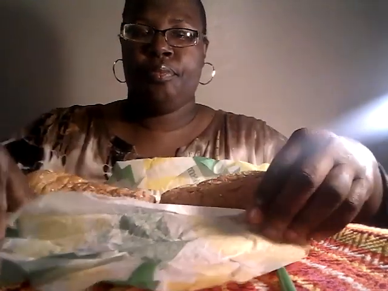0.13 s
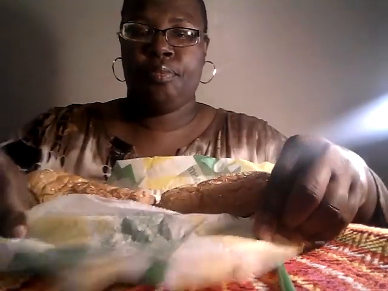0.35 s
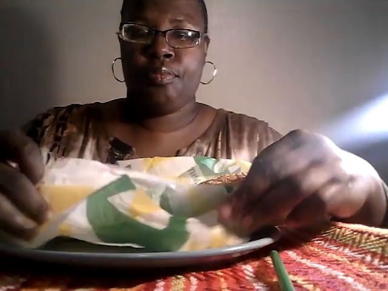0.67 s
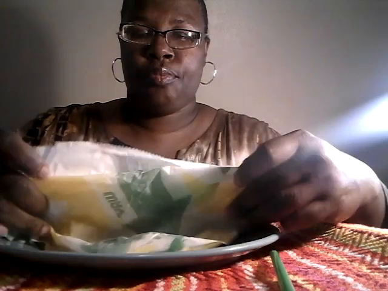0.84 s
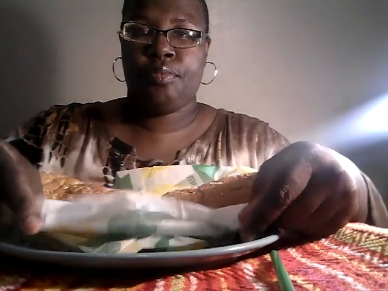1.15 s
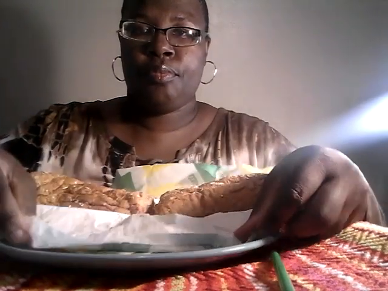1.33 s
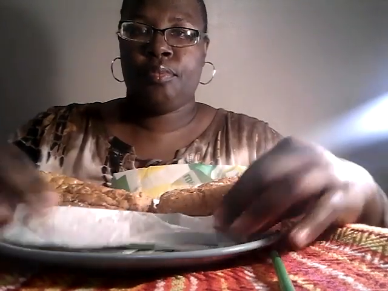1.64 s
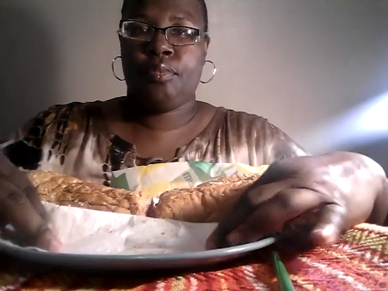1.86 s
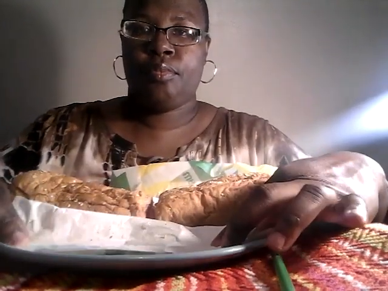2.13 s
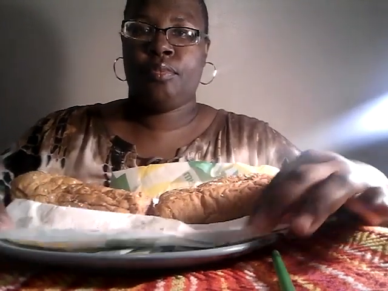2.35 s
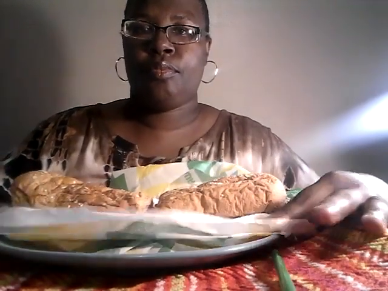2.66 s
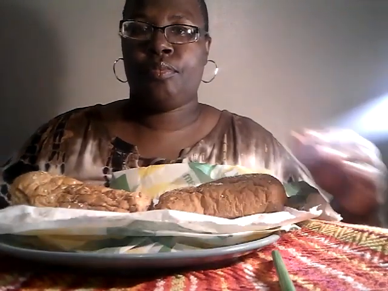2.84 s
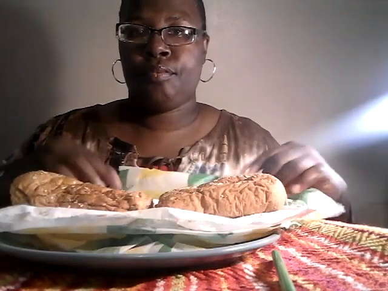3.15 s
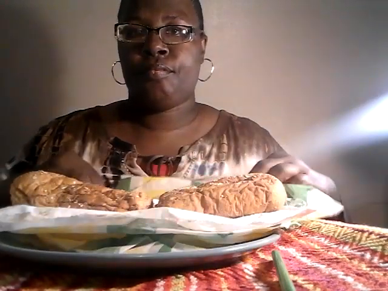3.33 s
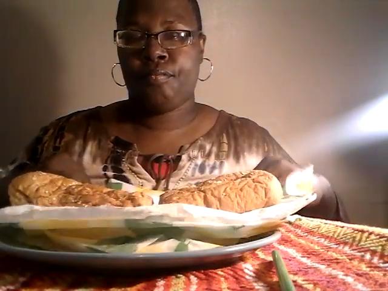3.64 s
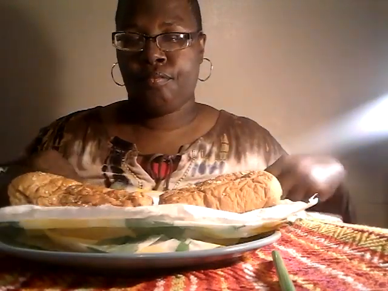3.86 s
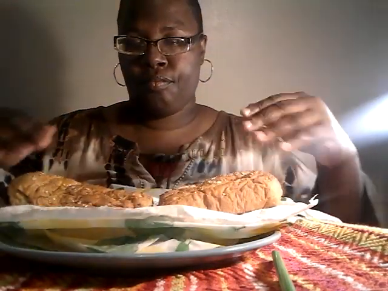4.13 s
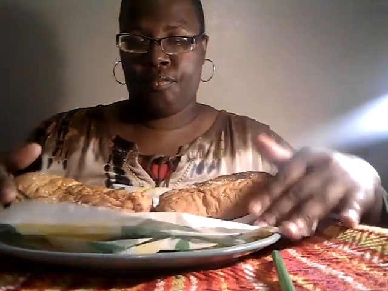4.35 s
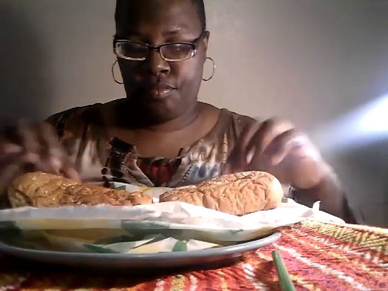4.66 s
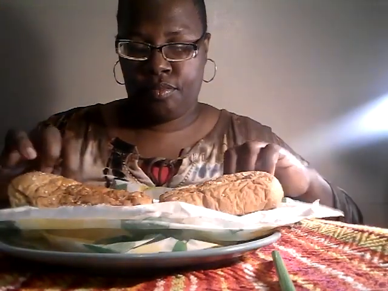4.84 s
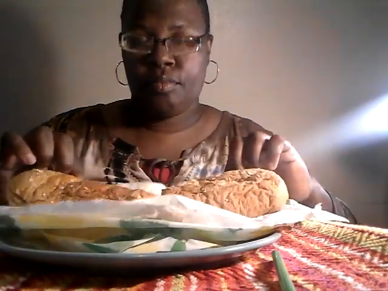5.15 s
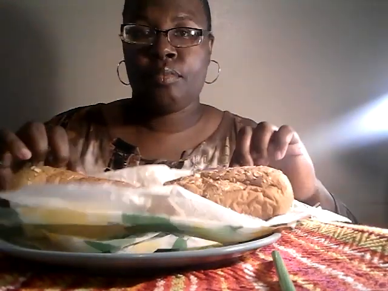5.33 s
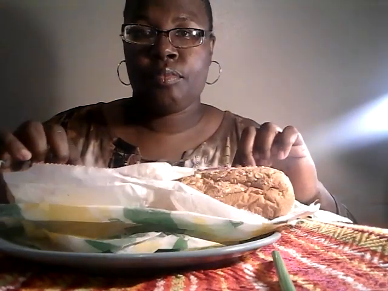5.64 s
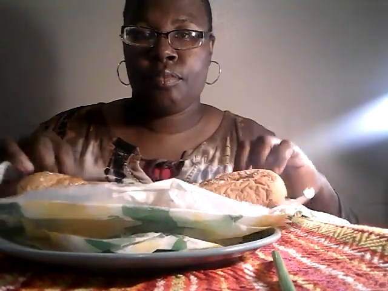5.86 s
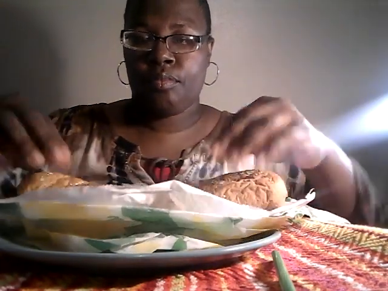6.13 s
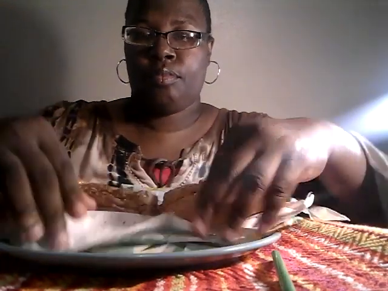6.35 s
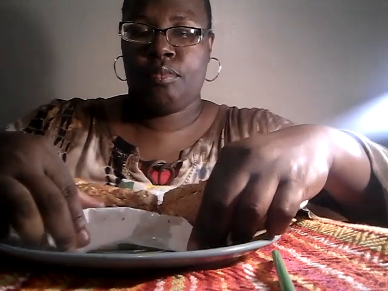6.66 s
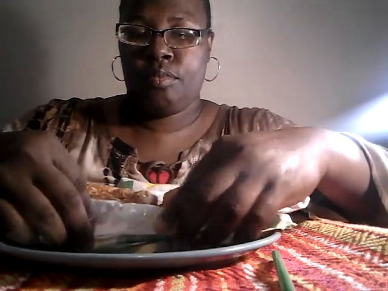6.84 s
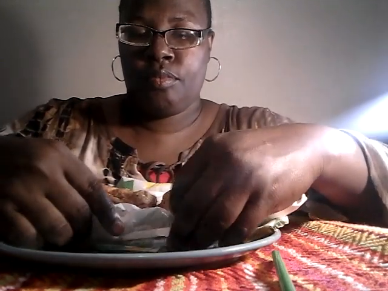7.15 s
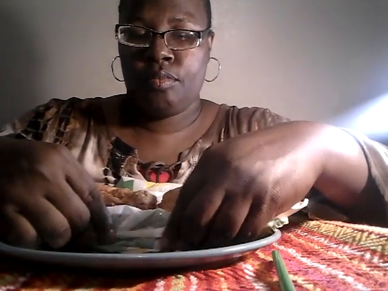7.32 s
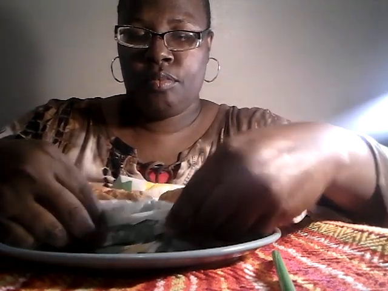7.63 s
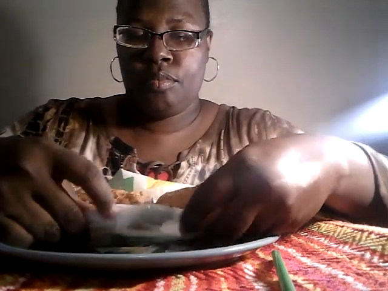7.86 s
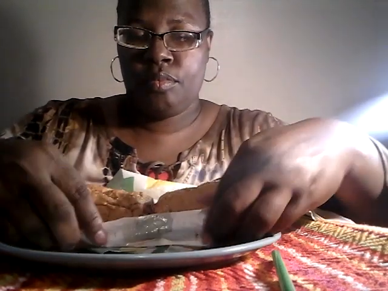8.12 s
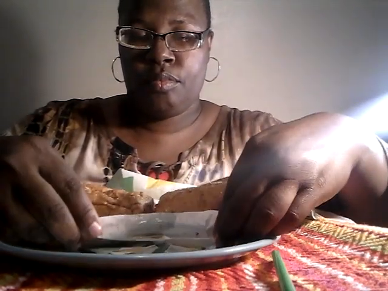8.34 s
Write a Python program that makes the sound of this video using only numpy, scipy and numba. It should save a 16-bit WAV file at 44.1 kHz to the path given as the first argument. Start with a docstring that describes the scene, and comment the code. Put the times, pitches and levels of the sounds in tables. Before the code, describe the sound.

A close tabletop stereo microphone in a small dry room picks up a greasy paper wrapper being handled on a plate. After a near-quiet instant, crackling starts at about 0.3 s and swells to its loudest, stiff mid-pitched snaps over dense rustle, around 1 s. It stays busy until about 2 s, then thins to lighter crinkles, almost stopping near 3.0 s. A smaller flurry runs from 3.2 to 3.9 s. From 4 to 6.3 s there are mostly faint, sparse creases, with a brief rustle and tiny plate-rim taps near 4.5 and 4.9 s. Rustling resumes around 6.4 s, and strong crunches from 6.9 s continue to about 8.1 s, easing but still rustling at the end. Thin bright ticks and dull low plate bumps are scattered throughout. A soft, steady fan hum with airy rush and slight hiss remains underneath; the right side sounds brighter.

```python
"""Hands fold and press a greasy paper wrapper on a plate, close to a small two-port microphone on the table.
Stiff creases are short ringing grains with neighbours around them; the rustle is swarms of finer grains.
Thin ticks, rim knocks and dull plate thuds are grains too; a short noise tail makes the small room.
Behind them a fan hums: coloured noise for the air and a few low tones with wandering phase."""
import sys
import numpy as np
from scipy import signal
from scipy.fft import rfft, irfft, next_fast_len
from scipy.io import wavfile
from numba import njit

SR = 44100
rng = np.random.default_rng(int(sys.argv[2]) if len(sys.argv) > 2 else 0)


def log_audio(samples):
    """Write samples as a 16-bit WAV file to the path given in sys.argv[1]."""
    # one column per channel
    frames = np.atleast_2d(samples).T
    # limit to full scale, then quantise
    limited = np.clip(frames, -1, 1)
    pcm = np.round(limited * 32767).astype(np.int16)
    wavfile.write(sys.argv[1], SR, pcm)


def magnitude_from_level(level_db):
    """Linear magnitude for a level in decibels (20 dB per decade)."""
    exponent = np.asarray(level_db, float) / 20
    return 10 ** exponent


N = 374409  # length in samples
SIZE = next_fast_len(N + N % 2, True)
HZ = np.fft.rfftfreq(SIZE, 1 / SR)

# loud creases, before the sheet's colour: [t/s, ring level/dB, ring f/Hz, crack level/dB, crack f/Hz]
LOUD_CREASES = [(0.1607, -42, 2290, -44, 2400), (0.3081, -16.5, 1490, -36, 3340),
                (0.35, -29, 2290, -14.5, 2400), (0.3881, -16, 1450, -30, 3900),
                (0.397, -20, 2290, -14, 2400), (0.4142, -13, 2000, -29, 2540),
                (0.442, -15, 1740, -16, 3650), (0.4633, -12, 1540, -11.5, 2440),
                (0.549, -27, 2290, -14.5, 2450), (0.5663, -18, 1410, -33, 2590),
                (0.603, -26, 1960, -19, 4130), (0.6639, -23, 1420, -23, 2400),
                (0.6997, -13, 1540, -20, 2700), (0.7324, -16.5, 1410, -15, 2400),
                (0.7634, -14, 1450, -23, 2400), (0.8074, -15, 1320, -19, 3380),
                (0.824, -12, 1240, -31, 3880), (0.8618, -11.5, 1240, -27, 2820),
                (0.921, -8.5, 1280, -16, 3100), (0.981, -20, 840, -15, 3700), (0.9984, -6, 1420, -16, 3930),
                (1.052, -34, 930, -7.5, 3130), (1.1103, -19, 2160, -19, 2400),
                (1.1322, -17, 1200, -12, 2660), (1.1418, -27, 1950, -10, 2970),
                (1.1637, -28, 2290, -13, 3280), (1.2013, -18, 2150, -16, 3540),
                (1.2111, -19, 1420, -24, 3700), (1.2574, -22, 1010, -9.5, 4000),
                (1.2986, -20, 1350, -20, 4030), (1.3135, -11.5, 1200, -19, 2700),
                (1.3464, -14, 1520, -15, 3000), (1.362, -15.5, 1050, -25, 2940),
                (1.4612, -16.5, 2070, -27, 2720), (1.5029, -14.5, 1230, -39, 2450),
                (1.5855, -21, 1410, -24, 3680), (1.637, -24.5, 1240, -47, 2400),
                (1.668, -21, 1130, -31, 2400), (1.725, -18, 2190, -23, 2700), (1.792, -31, 1340, -36, 3800),
                (1.8283, -25, 1080, -34, 2720), (1.847, -22, 1820, -17, 3060),
                (1.8793, -15, 1130, -23, 3080), (1.8882, -19, 1180, -21, 3930),
                (1.9352, -29, 2120, -20, 2830), (1.963, -18, 1580, -22, 3890),
                (1.9749, -15, 1220, -15, 3200), (2.0016, -37, 1150, -26.5, 3520),
                (2.0243, -36, 1360, -28, 3000), (2.0568, -23, 1700, -32, 2400),
                (2.1526, -39, 1290, -28, 3600), (2.177, -17.5, 1820, -11, 3680),
                (2.2638, -40, 880, -49, 3490), (2.2987, -31, 1160, -50, 3090),
                (2.3273, -23, 1040, -38, 2680), (2.3619, -28, 1150, -25, 4180),
                (2.515, -29, 2060, -25, 2870), (2.5183, -30, 1900, -28, 3800),
                (2.548, -32, 1110, -25, 3810), (2.5567, -31, 2290, -17, 2400), (2.59, -23, 2030, -32, 2400),
                (2.6134, -23, 1810, -41, 2400), (2.6368, -19, 1960, -26, 2400),
                (2.659, -25, 1420, -38, 4150), (2.7268, -18.5, 1700, -27, 3760),
                (2.909, -32, 1570, -41, 2400), (2.9198, -35, 2220, -24, 3900),
                (2.9518, -30, 1280, -30, 3240), (3.127, -48, 890, -37.5, 3560),
                (3.179, -33, 2090, -43, 3640), (3.199, -25, 1410, -28.5, 2600),
                (3.2212, -27, 1530, -33, 3100), (3.228, -28, 1400, -42, 3140),
                (3.2924, -24, 1280, -27, 2400), (3.2987, -19, 2270, -34, 2400),
                (3.354, -17.5, 2030, -41, 2500), (3.3875, -30, 980, -31, 2400),
                (3.4667, -25.5, 1620, -43, 2400), (3.4824, -25, 1630, -36, 2400),
                (3.503, -18, 1160, -42, 4360), (3.5106, -25.5, 1420, -33, 2410),
                (3.558, -16.5, 760, -20, 2400), (3.5974, -13, 2180, -31, 2400),
                (3.609, -18, 2070, -37, 3090), (3.6158, -25, 860, -30, 2690), (3.623, -22, 1460, -34, 2510),
                (3.6457, -24, 1120, -26, 2400), (3.6562, -16, 1260, -20.5, 2400),
                (3.685, -22, 1980, -40, 2990), (3.6748, -23, 1900, -29, 2980),
                (3.6943, -29, 2290, -23, 2400), (3.703, -21, 2270, -28, 2450),
                (3.835, -40.5, 2290, -25, 2450), (3.848, -24, 1520, -39, 3140),
                (3.9, -24.5, 1490, -30, 2750), (4.3626, -49, 840, -40, 3890),
                (4.4736, -22.5, 1990, -38, 2400), (4.4863, -28, 2150, -35, 2400),
                (4.5311, -37, 1430, -32, 2400), (4.5663, -32, 890, -44, 2940),
                (4.7102, -55, 840, -54, 3110), (4.9076, -51, 750, -42, 2890), (4.921, -38, 830, -39, 3880),
                (4.964, -38, 1250, -40, 2830), (5.045, -39, 1010, -56, 2400),
                (5.2397, -34, 2170, -41, 2400), (5.284, -34, 1590, -58, 2810),
                (5.3678, -41, 1090, -30, 3200), (5.5529, -52, 1010, -44, 3670),
                (5.7273, -49, 2290, -42, 2520), (5.9014, -42, 1500, -34, 2600),
                (5.9284, -37, 2090, -29, 3460), (6.0767, -46, 1440, -41, 3270),
                (6.3264, -33.5, 1640, -45, 2400), (6.378, -42, 790, -33, 3800),
                (6.4187, -28, 1840, -23, 2900), (6.457, -24.5, 1830, -35, 2660),
                (6.5424, -24, 1370, -22, 3100), (6.639, -35, 2000, -34, 3770),
                (6.7297, -39, 1570, -22, 3730), (6.8756, -11.5, 1330, -13, 2980),
                (6.891, -15, 1280, -23, 2600), (6.9333, -31, 2290, -20, 3030), (6.96, -40, 1160, -21, 2720),
                (6.9744, -16, 1590, -18, 3970), (7.006, -33, 1910, -18, 2820),
                (7.0747, -12, 1370, -15, 4030), (7.1117, -22, 2050, -19, 3430),
                (7.153, -36, 1510, -22, 3730), (7.1807, -33, 1120, -22, 3920),
                (7.217, -18.5, 1400, -27, 2400), (7.2902, -21, 1430, -23, 3790),
                (7.3248, -26, 1410, -40, 3670), (7.396, -22, 1390, -35, 2670),
                (7.4161, -27, 1580, -21, 3600), (7.435, -35, 1640, -16, 3220),
                (7.4772, -19, 1380, -15, 3240), (7.485, -27.5, 2170, -14, 3190),
                (7.5274, -20, 2130, -18, 3640), (7.5769, -34, 1540, -21, 3810),
                (7.676, -32, 1800, -16.5, 3400), (7.691, -21.5, 1310, -24, 2610),
                (7.701, -38, 2290, -13, 3160), (7.726, -32, 1320, -14, 2670),
                (7.7714, -30, 1430, -31, 2400), (7.8, -25, 1400, -12.5, 3700),
                (7.836, -17, 1220, -11.5, 3050), (7.882, -21, 2290, -20, 2400),
                (7.907, -15, 2100, -25, 2960), (7.961, -21, 2160, -25, 3830), (7.998, -29, 2290, -21, 2890),
                (8.03, -17, 1350, -22.5, 3880), (8.046, -32, 2230, -24, 3400),
                (8.098, -24, 2290, -13.5, 3820), (8.2129, -18.5, 1950, -40, 3100),
                (8.2354, -36, 1130, -27, 3340), (8.2676, -38, 1380, -34, 2510),
                (8.3293, -31, 1270, -38.5, 3540), (8.3822, -25, 1150, -20, 3670),
                (8.3896, -26, 1280, -29, 2440), (8.461, -22, 1550, -37, 2400)]
# colour of a snap, little bass and soft treble: [f/Hz, level/dB]
SNAP_COLOUR = [(200, -18), (500, 1), (720, 0.5), (1150, -2.5), (1420, -1.5), (1750, 0), (4200, -1),
               (5500, -5), (16000, -15)]
# lesser creases popping at random: candidates, and the effort below which none pops
POPS, STILL_DB = 40, -46
# strongest pop over the rustle, scatter downward from it, most that ring or crack drops against the other
POP_DB, POP_FALL_DB, POP_LEAN_DB = 9.5, 6, 1
POP_RING_HZ, POP_CRACK_HZ = (880, 2450), (2400, 4180)
# sharp edge against the louder of ring and crack
EDGE_DB, EDGE_SCATTER_DB = -30.5, 4.5

# how hard the hands work the paper, as a guide for the rustle: [t/s, level/dB]
HAND_EFFORT = [(0.0, -71), (0.09, -58), (0.148, -48.5), (0.162, -38), (0.26, -31.5), (0.37, -33),
               (0.4, -31.5), (0.43, -32), (0.51, -26.5), (0.59, -34), (0.63, -31.5), (0.68, -33.5),
               (0.8, -26), (0.84, -31.5), (0.93, -25), (0.96, -30), (0.99, -23), (1.025, -25), (1.06, -27),
               (1.09, -30.5), (1.13, -27), (1.18, -29), (1.23, -33), (1.26, -30), (1.3, -31.5), (1.35, -29),
               (1.39, -31), (1.46, -28.5), (1.51, -33.5), (1.56, -40.5), (1.77, -36.5), (1.89, -26),
               (2.15, -37), (2.17, -36.5), (2.22, -43.5), (2.36, -38.5), (2.48, -40.5), (2.55, -36.5),
               (2.6, -39.5), (2.72, -36), (2.88, -47.5), (2.915, -40.5), (2.94, -49), (3.02, -63),
               (3.11, -65), (3.22, -40.5), (3.28, -49.5), (3.3, -41), (3.35, -37), (3.375, -37.5),
               (3.4, -36.5), (3.44, -42.5), (3.5, -38), (3.535, -41), (3.56, -30.5), (3.63, -36),
               (3.67, -36), (3.74, -36), (3.8, -44.5), (3.83, -44.5), (3.845, -38.5), (3.9, -39),
               (3.915, -41.5), (3.95, -38.5), (3.97, -46), (4.04, -54), (4.15, -63), (4.23, -54),
               (4.34, -63), (4.375, -47.5), (4.45, -35.5), (4.51, -43.5), (4.57, -41.5), (4.69, -54),
               (4.77, -63), (4.89, -57), (4.915, -47), (5.03, -52), (5.16, -55.5), (5.32, -52),
               (5.38, -43.5), (5.41, -46.5), (5.46, -43.5), (5.56, -73), (5.82, -54.5), (5.93, -46),
               (5.98, -59), (6.27, -65), (6.35, -50.5), (6.385, -41.5), (6.48, -36), (6.79, -38),
               (6.88, -27), (7.05, -34), (7.07, -26), (7.14, -36.5), (7.35, -37), (7.45, -30.5),
               (7.55, -33), (7.665, -34.5), (7.68, -31.5), (7.83, -26.5), (7.87, -35), (7.94, -34.5),
               (8.0, -31.5), (8.09, -29.5), (8.16, -36.5), (8.42, -37.5), (8.49, -28)]
# colour of the rustle against its middle: [t/s, bass level/dB, upper mids level/dB, treble level/dB]
RUSTLE_TILT = [(.2, 2, -3, 2), (.55, 0.5, 2, 6.5), (.8, 0, 2, 2.5), (.98, 8, 2.5, 2.5), (1.15, 5, 3.5, 4),
               (1.4, -2.5, -2, 1), (1.7, 1, -4, 1.5), (2.2, -7, -4, -3.5), (2.6, -3.5, -0.5, 3.5),
               (3.0, -6, 1, 5.5), (3.3, 8, -3.5, 4), (3.45, 2, -6, 3), (3.56, 6.5, -1.5, 7),
               (3.7, 0.5, -0.5, 3.5), (4.451, -1, -1, 2.5), (5.0, 0, -0.5, 0.5), (5.9, -4, -1.5, -1),
               (6.5, -1.5, -1.5, 1), (7.0, -0.5, -0.5, 0.5), (7.5, -4, 2.5, 4), (8.0, -6, 2, 1.5),
               (8.35, -4.5, -3, -1)]
# colour of the rustling paper: [f/Hz, level/dB per Hz]
PAPER_COLOUR = [(30, -48), (55, -16.5), (90, -16), (250, -16.5), (400, -12.5), (570, -9), (690, -3.5),
                (1000, -2), (1220, -1), (1400, 1), (1650, -2.5), (1950, -2), (2400, -2), (3000, -7),
                (4000, -17), (4700, -23), (5500, -24.5), (7000, -29), (9000, -34), (11800, -36.5),
                (14000, -33), (15800, -33)]
BANDS_HZ = (350, 1200, 3500, 8000)  # bass, middle, upper mids, treble
GRAINS, SWARMS = 60000, 2200
FLUTTER_DB, FLUTTER_PER_S = 1.5, 70

# thin bright ticks of small stiff creases: [t/s, level/dB]
THIN_TICKS = [(0.101, -49), (0.131, -43), (0.1632, -36), (0.2555, -27), (0.298, -34), (0.3484, -26),
              (0.3857, -22), (0.44, -23), (0.6012, -23), (0.62, -22), (0.635, -19.5), (0.695, -25),
              (0.7259, -30), (0.7658, -33), (0.8476, -26), (0.899, -32), (0.92, -27), (0.9823, -22),
              (1.2517, -26), (1.319, -27), (1.3445, -23), (1.5001, -20.5), (1.7237, -30), (1.8269, -34),
              (1.9735, -24), (2.1745, -40), (2.207, -36), (2.3612, -36), (2.5548, -38), (2.672, -30),
              (2.848, -38), (3.2905, -31.5), (3.4821, -40), (3.547, -31), (3.555, -21), (3.679, -41),
              (3.7176, -40), (3.94, -37), (4.384, -46), (4.456, -33), (4.559, -36), (4.6704, -42),
              (4.974, -45), (5.195, -56), (5.240, -51), (5.3664, -49), (5.9001, -40), (5.9231, -44),
              (6.399, -37), (6.4504, -44), (6.5397, -36), (6.793, -35), (6.6465, -38), (6.908, -41),
              (6.9313, -42), (6.9652, -33), (7.045, -30), (7.1795, -20), (7.288, -30), (7.3244, -33),
              (7.526, -36), (7.5763, -36), (7.6726, -35), (7.726, -26), (7.7789, -25), (7.812, -30),
              (8.0288, -34), (8.0597, -25), (8.0962, -32), (8.3281, -41), (8.3805, -34), (8.445, -46),
              (8.4623, -32)]
# the finest ticks, all from 8 kHz up: [t/s, level/dB]
FINEST_TICKS = [(0.557, -26.5), (0.580, -31), (0.941, -29), (1.880, -33), (3.199, -45), (3.835, -42),
                (6.630, -38), (6.802, -40), (6.811, -40), (6.860, -31), (7.075, -29), (7.210, -37),
                (7.594, -36), (7.632, -35), (7.968, -36)]
# something hard taps the plate rim: [t/s, level/dB]
RIM_TAPS = [(4.468, -51), (4.566, -43), (4.915, -40.5)]
# notes of the plate rim: [f/Hz, cycles to the crest, level/dB against the tap]
RIM_NOTES = [(690, 4.13, -4), (760, 4, -6), (910, 3.3, -17)]
# fingers and bread bump the plate: [t/s, guide level/dB, f/Hz]
PLATE_BUMPS = [(0.189, -46, 83.4), (0.281, -48, 98.7), (0.495, -33.5, 113), (0.749, -40, 96.9),
               (0.864, -36, 156), (1.109, -37, 108), (1.709, -47, 86), (1.821, -41, 116), (2.094, -42, 188),
               (2.164, -41, 139), (2.254, -42.5, 98), (2.948, -45.5, 97), (3.293, -38.5, 196),
               (3.35, -43, 99.6), (3.496, -43.5, 75.4), (3.55, -37.5, 160), (4.492, -41.5, 100),
               (4.557, -46, 112), (5.12, -46.5, 85.5), (5.88, -55, 89), (6.323, -43, 93), (6.841, -38, 107),
               (6.928, -45, 92), (7.59, -43, 110), (7.677, -37, 162), (7.719, -39, 102), (8.397, -47, 105)]

ROOM_T60_S, ROOM_DB = 0.08, -12
# fan tones: [f/Hz, width/Hz, rms level/dB]
FAN_TONES = [(77, 4.1, -64), (111.6, 3.37, -65), (287, 4.5, -70), (309.8, 2.17, -64), (390, 14.3, -66.5),
             (505.7, 2.51, -64)]
# colour of the fan's air: [f/Hz, level/dB per Hz]
FAN_AIR = [(30, -19), (60, -5), (90, -0.5), (200, -5), (400, -2), (620, 1), (850, 4), (1400, 0.5),
           (2200, -3.5), (3000, -14), (4000, -29.5), (7000, -40)]
AIR_DB, HISS_DB = -49.5, -66  # rms

# what the right port adds: [f/Hz, level/dB]
RIGHT_PORT_COLOUR = [(300, 0.5), (900, -1), (2200, -2), (3000, 6), (3500, 11), (4000, 16.5), (4500, 13.5),
                     (5500, 9.5), (7000, 6.5), (9000, 5), (12000, 1), (15500, 0)]
ECHO_S, ECHO_HZ, ECHO_SHARE = 0.00999, (237, 724), 0.6


def snaps():
    """A stiff crease pops through: ring, brighter crack and sharp edge together, neighbours giving way around it."""
    s, ring_db, ring_hz, crack_db, crack_hz, edge_db = creases()
    draw = rng.random((len(s), 10)).T
    pan_db = 6 * (draw[0] - 0.5)
    # the crack is given as heard through both ports
    heard = (1 + magnitude_from_level(np.interp(crack_hz, *np.transpose(RIGHT_PORT_COLOUR)))) / 2
    # each part: delay in s, Hz, cycles to the crest, size
    parts = [(0, ring_hz, 0.5 + 0.5 * draw[1], magnitude_from_level(ring_db)),
             (0, crack_hz, 0.81 + 0.67 * draw[2], magnitude_from_level(crack_db) / heard)]
    # the edge is three grains within a millisecond either side
    for step, pitch in draw[4:].reshape(3, 2, -1):
        parts.append((0.00188 * (step - 0.5), 5200 * 3.0 ** pitch, 1.26, magnitude_from_level(edge_db - 2.0)))
    # a very short snap joins ring and crack
    parts.append((0.000097, np.sqrt(ring_hz * crack_hz), 0.25, magnitude_from_level((ring_db + crack_db) / 2 - 7.0)))
    # the crack reaches upward, its level taken from crack and edge
    parts.append((0.00027, 4800 * 3.9 ** draw[3], 1, magnitude_from_level((crack_db + edge_db) / 2 - 6)))
    # smaller creases nearby give way first, and more as the strain drains, weaker the further off in time
    main_parts = parts[:3]
    for late, bend in rng.random((len(s), 16)).T.reshape(8, 2, -1):
        late = 1.4 * late - 0.4
        late_s = np.sign(late) * (0.001535 + 0.012 * late ** 2) * (0.63 + 0.6 * bend)
        weaker = magnitude_from_level(-15.5 - 7.8 * abs(late))
        for _, hz, cycles, size in main_parts:
            parts.append((late_s, hz * 1.72 ** (bend - 0.5), cycles, size * weaker))
    late_s, hz, cycles, size = (np.concatenate([v + 0 * s for v in column]) for column in zip(*parts))
    s, pan_db = np.tile(s, len(parts)), np.tile(pan_db, len(parts))
    # start early enough for the crests to line up
    return at_ports(s + late_s - cycles / hz, hz, cycles, size, pan_db, 0.00008)


def creases():
    """The loud creases, then lesser ones whose strength follows the effort."""
    draw = rng.random((POPS, 5)).T
    draw[0] *= N / SR
    when, luck, ring, lean, crack = draw[:, effort_db(draw[0]) > STILL_DB]
    db = effort_db(when) + POP_DB + POP_FALL_DB * np.log(1 - 0.98 * luck)
    lean_db = POP_LEAN_DB * (2 * lean - 1)

    def between(ends, x):
        return ends[0] * (ends[1] / ends[0]) ** x

    lesser = [when, db - np.maximum(lean_db, 0), between(POP_RING_HZ, ring),
              db + np.minimum(lean_db, 0), between(POP_CRACK_HZ, crack)]
    both = np.concatenate([np.transpose(LOUD_CREASES), lesser], axis=1)
    s, ring_db, ring_hz, crack_db, crack_hz = both
    edge_db = np.maximum(ring_db, crack_db) + EDGE_DB + EDGE_SCATTER_DB * rng.standard_normal(len(s))
    return s, ring_db, ring_hz, crack_db, crack_hz, edge_db


def rustle():
    """Small creases give way in swarms: one fold sets off its neighbours within milliseconds."""
    s, bass_db, upper_db, treble_db = np.transpose(RUSTLE_TILT)
    knots = np.arange(0, N / SR + 1, 1 / FLUTTER_PER_S)
    flutter_db = FLUTTER_DB * rng.standard_normal(len(knots))
    draw = rng.random((GRAINS, 7)).T
    swarm = rng.random((SWARMS, 4)).T
    which = (draw[0] * SWARMS).astype(int)
    when = swarm[0][which] * N / SR + 0.003 * np.log(1 / draw[1] - 1)
    # the rest are lone fibres slipping under the fingers at any time; the finer, the more often alone
    lone = draw[5] < 0.7 - 0.5 * draw[2]
    when = np.where(lone, draw[6] * N / SR, when)
    octaves = np.log2(16000 / 50)
    hz = 16000 / 2 ** (octaves * draw[2] ** 1.417)
    # each fold favours the pitch of its own flap of paper, which rings a little longer
    flap = np.exp(-(np.log2(hz / 800) - 2.57 * swarm[3][which]) ** 2 / 0.033) * ~lone
    cycles = 0.26 + 0.59 * draw[3] ** 2 + 1.3 * flap
    luck_db = -2.4 * np.log(1 - 0.995 * draw[4]) + 1.3 * swarm[1][which] ** 2 * ~lone
    luck_db += 6 * flap
    # balance the pitches before the paper's colour
    size = magnitude_from_level(luck_db) * hz / np.sqrt(cycles) * draw[2] ** 0.059
    # rms of the steady rustle, divided out so that the effort sets the level
    even = np.sqrt(np.mean(colour(rings(when, hz, cycles, size), PAPER_COLOUR) ** 2))
    size = size * magnitude_from_level(effort_db(when) + np.interp(when, knots, flutter_db) + 0.5) / even
    pan_db = 5 * (swarm[2][which] - 0.5)
    sheet = colour(at_ports(when, hz, cycles, size, pan_db, 0.00019), PAPER_COLOUR)
    # the colour drifts as the hands grip other parts of the sheet
    t = np.arange(N) / SR
    out = np.zeros((2, N))
    for one, db in zip(np.eye(len(BANDS_HZ)), (bass_db, 0 * s, upper_db, treble_db)):
        share = np.interp(np.log(HZ + 1), np.log(BANDS_HZ), one)
        out += shape(sheet, share) * magnitude_from_level(np.interp(t, s, db))
    return out


def effort_db(s):
    """Guide level of the rustle at given times."""
    return np.interp(s, *np.transpose(HAND_EFFORT))


def ticks(table, lowest_hz, fall_db):
    """A tick is ten very short grains within two milliseconds, up to 15.2 kHz, the level sloping by fall_db."""
    grains = 10
    s, db = np.repeat(np.transpose(table), grains, axis=1)
    late, pitch, side = rng.random((len(s), 3)).T
    pitch = (np.arange(len(s)) % grains + pitch) / grains
    hz = lowest_hz * (15200 / lowest_hz) ** pitch
    size = magnitude_from_level(db - 6.5 - fall_db * pitch)
    return at_ports(s + 0.001676 * late ** 2, hz, 0.6 + 0 * s, size, 6 * (side - 0.5), 0.00008)


def knocks():
    """Each tap rings the same few notes of the rim, their crests together."""
    s, db = np.transpose(RIM_TAPS)
    return sum(at_ports(s - cycles / hz, hz + 0 * s, cycles + 0 * s, magnitude_from_level(db + note_db), 0 * s, 0.0001)
               for hz, cycles, note_db in RIM_NOTES)


def thuds():
    """Soft bumps carried through the table, each a little off to one side."""
    s, db, hz = np.transpose(PLATE_BUMPS)
    side, late, pitch = rng.random((len(s), 3)).T
    pan_db = 8 * (side - 0.5)
    bump = at_ports(s, hz, 0.79 + 0 * s, magnitude_from_level(db - 3.0), pan_db, 0.0008)
    # the plate settles with a second, higher bump
    settle_hz = 2.42 * 1.8 ** pitch * hz
    settle = at_ports(s + 0.0124 * late, settle_hz, 0.87 + 0 * s, magnitude_from_level(db + 5.5), pan_db, 0.00026)
    return bump + settle


def room(x):
    """Plate, table and walls return a short dense tail of decaying noise."""
    t = np.arange(int(SR * ROOM_T60_S)) / SR
    tail = pair(2200)[:, :len(t)] * magnitude_from_level(-60 * t / ROOM_T60_S) * (t > 0.0012)
    tail *= magnitude_from_level(ROOM_DB) / np.sqrt(np.sum(tail ** 2, axis=1, keepdims=True))
    return x + signal.fftconvolve(x, tail, axes=1)[:, :N]


def fan():
    """Rushing air with a few low tones whose phase wanders, which widens each tone."""
    t = np.arange(N) / SR
    tones = np.zeros(N)
    for hz, width, db in FAN_TONES:
        wander = np.cumsum(rng.standard_normal(N)) * np.sqrt(2 * np.pi * width / SR)
        tones += set_rms(np.sin(2 * np.pi * hz * t + wander), db)
    return set_rms(colour(pair(460), FAN_AIR), AIR_DB) + tones


@njit
def rings(s, hz, cycles, size):
    """Each grain is a sine that swells to its crest, size, after the given cycles and then dies away."""
    out = np.zeros(N)
    for k in range(len(s)):
        first = max(int(s[k] * SR) + 1, 0)
        fade = hz[k] / cycles[k] / SR
        pole = 2j * np.pi * hz[k] / SR - fade
        t = first - s[k] * SR
        z, step = size[k] * np.e * fade * np.exp(pole * t), np.exp(pole)
        for i in range(first, min(int(first + 9 / fade), N)):
            out[i] += t * z.imag
            z, t = z * step, t + 1
    return out


def at_ports(s, hz, cycles, size, pan_db, spread_s):
    """Every grain sits elsewhere, so it reaches one port a little first; positive pan_db favours the left."""
    lag = spread_s * rng.uniform(-1.125, 1, len(s))
    return np.array([rings(s + side * lag / 2, hz, cycles, size * magnitude_from_level(side * pan_db / 2)) for side in (1, -1)])


def pair(alike_hz):
    """Noise at two ports: mostly the same in the bass, growing unrelated above alike_hz."""
    mid, side = rng.standard_normal((2, N))
    alike = 0.87 / (1 + (HZ / alike_hz) ** 2)
    return shape(mid, np.sqrt(1 + alike)) + shape(side, np.sqrt(1 - alike)) * np.array([[1], [-1]])


def colour(x, table):
    """Causal (minimum-phase) filter with the gain of (Hz, dB) points, by folding the cepstrum."""
    hz, db = np.transpose(table)
    cep = irfft(np.log(magnitude_from_level(np.interp(np.log(HZ + 1), np.log(hz), db))), SIZE)
    cep[1:SIZE // 2] *= 2
    cep[SIZE // 2 + 1:] = 0
    return shape(x, np.exp(rfft(cep)))


def shape(x, gain):
    """Multiplies the spectrum."""
    return irfft(rfft(x, SIZE) * gain, SIZE)[..., :N]


def set_rms(x, db):
    """Scales to the given rms in dB."""
    return x * magnitude_from_level(db) / np.sqrt(np.mean(x ** 2))


def scene():
    """Paper and rim knocks in the room, with the thuds and the fan added dry."""
    fine = ticks(THIN_TICKS, lowest_hz=3440, fall_db=9.5)
    fine += ticks(FINEST_TICKS, lowest_hz=8000, fall_db=-1.0)
    paper = rustle() + colour(snaps(), SNAP_COLOUR) + fine
    return room(paper + knocks()) + thuds() + fan()


def band_limit(x):
    """A steep low-pass at the top of the band."""
    return signal.sosfilt(signal.butter(12, 15960, fs=SR, output="sos"), x)


def record(dry):
    """The right port rings near 4 kHz; the low mids come back once, combing them; deep bass is cut; hiss."""
    lo, hi = ECHO_HZ
    band = 1 / (1 + (lo / (HZ + 1)) ** 8) / (1 + (HZ / hi) ** 8)
    echo = ECHO_SHARE * band
    comb = (1 + echo * np.exp(-2j * np.pi * HZ * ECHO_S)) / np.sqrt(1 + echo ** 2)
    bass_cut = signal.butter(2, 48, "high", fs=SR, output="sos")
    x = signal.sosfilt(bass_cut, shape(dry, comb))
    x = np.array([x[0], colour(x[1], RIGHT_PORT_COLOUR)])
    # the input stage rounds the loudest crests
    x = np.tanh(1.9 * x) / 1.9
    # the electronics hiss
    hiss = set_rms(rng.standard_normal((2, N)), HISS_DB)
    return band_limit(x + hiss)


dry = scene()
out = record(dry)
log_audio(out)
```